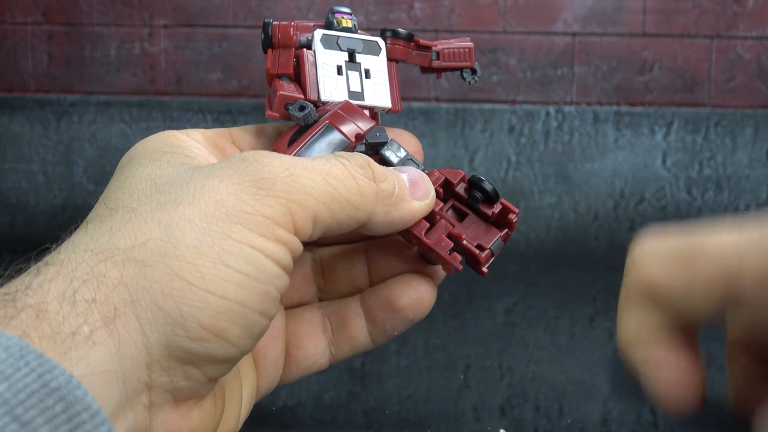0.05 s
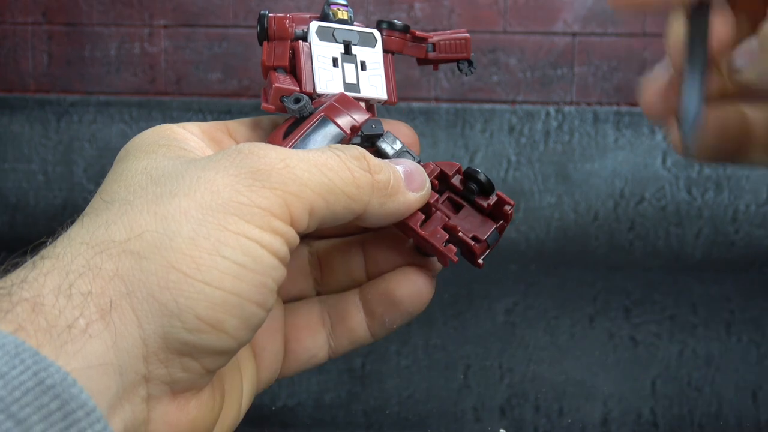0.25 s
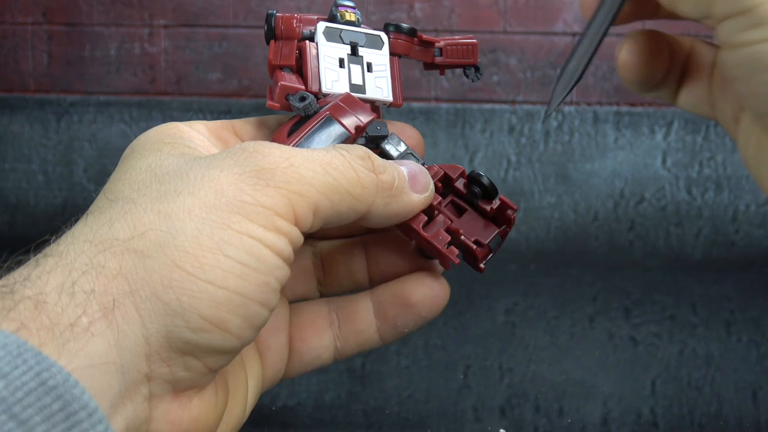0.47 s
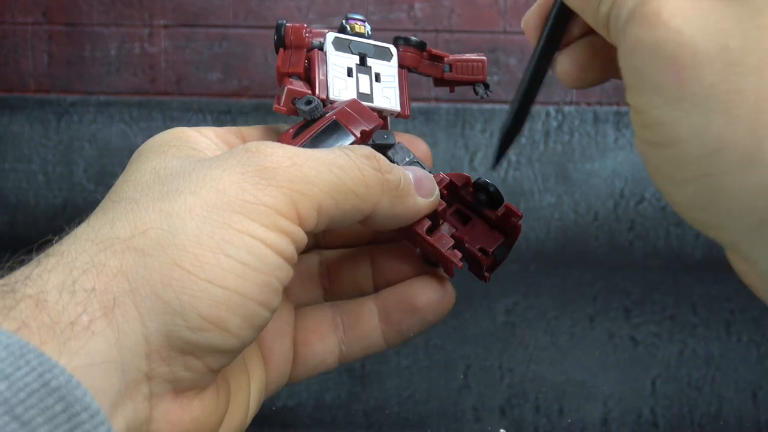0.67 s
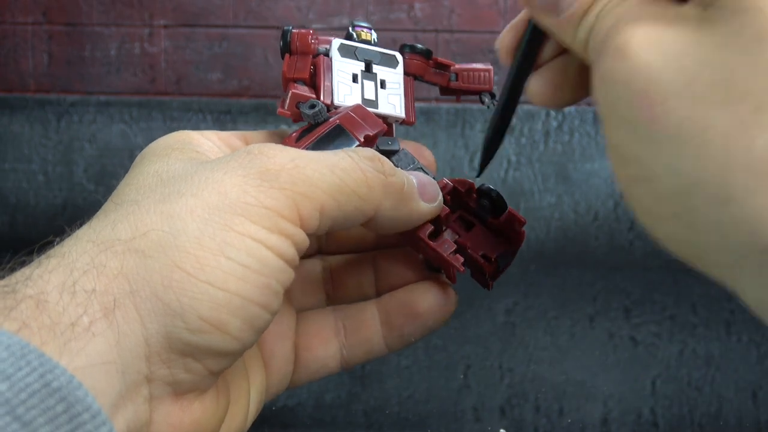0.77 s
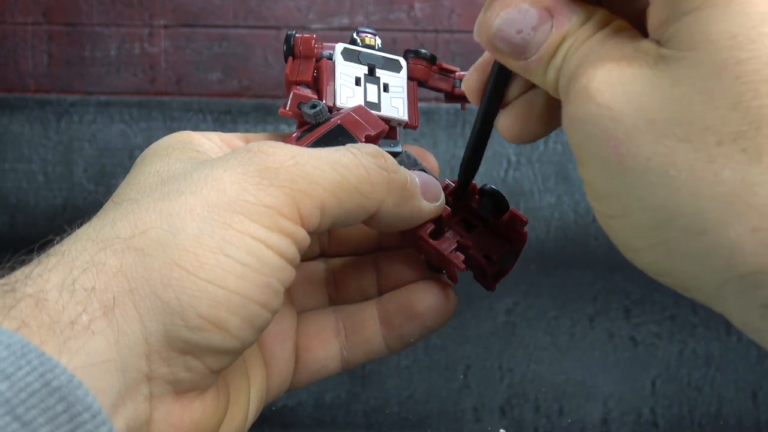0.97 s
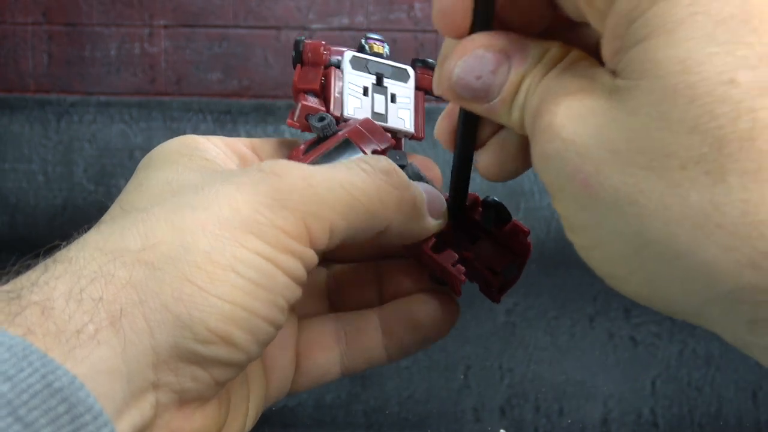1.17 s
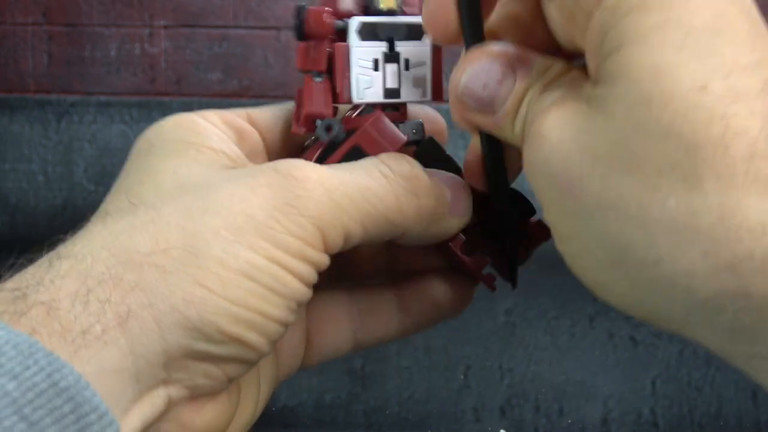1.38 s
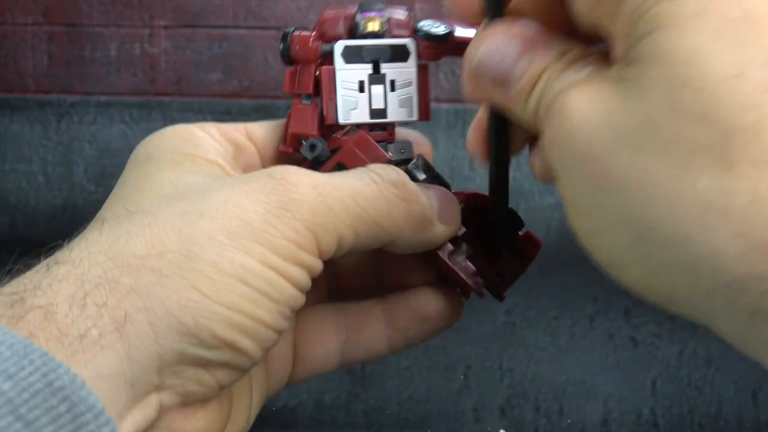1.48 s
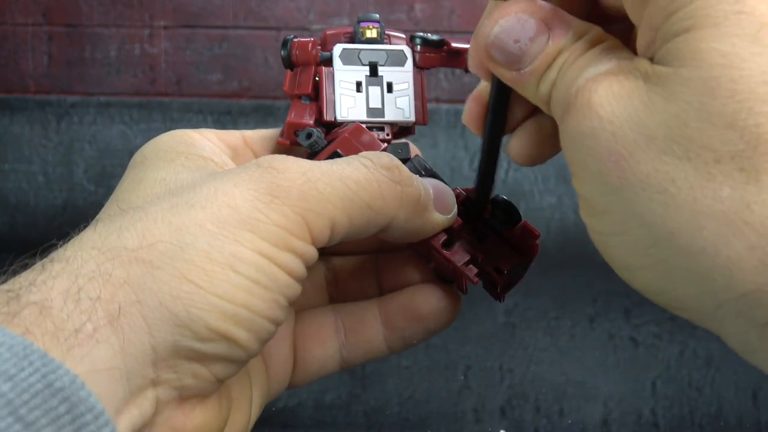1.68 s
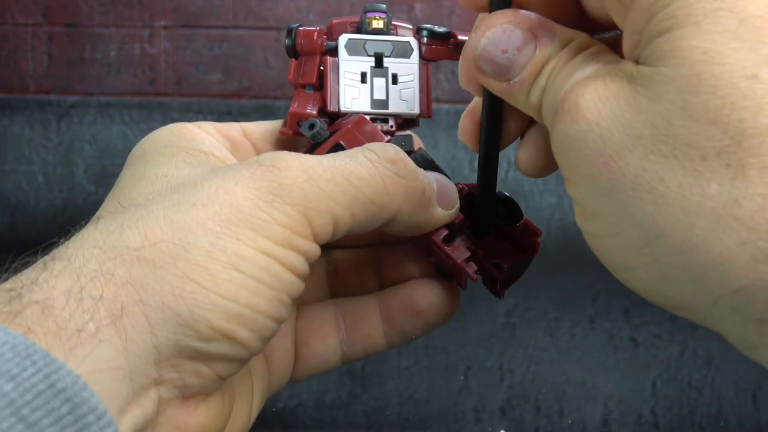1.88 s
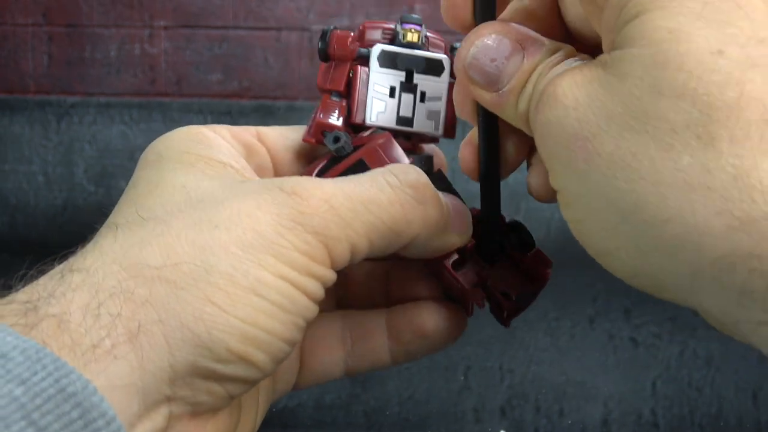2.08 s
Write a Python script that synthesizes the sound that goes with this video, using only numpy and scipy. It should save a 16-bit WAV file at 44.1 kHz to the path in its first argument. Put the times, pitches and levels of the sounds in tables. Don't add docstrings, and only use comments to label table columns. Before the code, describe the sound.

Close up in a quiet small room, fingers tick and rub on a plastic tool, its tip taps a hollow plastic figure, the joint snaps brightly with a small thud, rattles, and clicks a few more times.

```python
import sys
import numpy as np
from scipy import signal
from scipy.fft import rfft, irfft
from scipy.io import wavfile
from scipy.ndimage import uniform_filter1d

SR = 44100
rng = np.random.default_rng(int(sys.argv[2]) if len(sys.argv) > 2 else 0)


def log_audio(samples):
    frames = np.atleast_2d(samples).T
    limited = np.clip(frames, -1, 1)
    pcm = np.round(limited * 32767).astype(np.int16)
    wavfile.write(sys.argv[1], SR, pcm)


def makeup_ratio(level_db):
    decades = np.asarray(level_db, float) / 20
    return 10 ** decades


N = 94418


def band(x, lo_hz, hi_hz):
    return signal.sosfilt(signal.butter(3, [lo_hz, hi_hz], "bandpass", fs=SR, output="sos"), x)


def ring(force, modes):
    def bank(v):
        total = 0
        for hz, db, t60 in modes:
            pole = np.exp((2j * np.pi * hz - np.log(1000) / abs(t60)) / SR)
            total = total + makeup_ratio(db) * signal.lfilter([1], [1, -pole], v).imag
        return total
    return bank(force) / np.sqrt(np.sum(bank(signal.unit_impulse(2 ** 13)) ** 2))


def colour(points):
    hz, db = np.array(points, float).T
    f = np.maximum(np.arange(N // 2 + 1) * SR / N, 1)
    shape = makeup_ratio(np.interp(np.log(f), np.log(hz), db))
    noise = irfft(rfft(rng.standard_normal(N)) * shape, N)
    return noise / noise.std()


def swell(rows, column):
    t = np.arange(N) / SR
    total = np.zeros(N)
    for r in rows:
        rising = np.exp(np.clip((r[0] - t) / r[1], -50, 50))
        falling = np.exp(np.clip((t - r[0]) / r[2], -50, 50))
        total += 2 * makeup_ratio(r[column]) / (rising + falling)
    return total


def blows(rows, column, shapes):
    x = np.zeros(N + shapes.shape[1])
    for r, shape in zip(rows, shapes):
        i = max(int(r[0] * SR), 0)
        x[i:i + len(shape)] += makeup_ratio(r[column]) * shape
    return x[:N]


def push(rows, seconds):
    seconds = np.abs(seconds) * np.ones((len(rows), 1))
    bell = np.exp(-.5 * ((np.arange(1024) / SR - 2 * seconds) / (seconds / 2)) ** 2)
    return blows(rows, column=1, shapes=bell / bell.sum(axis=1, keepdims=True))


def flicker(count, hop):
    steps = np.repeat(rng.standard_normal((count, N // hop + 1)), hop, axis=1)
    return uniform_filter1d(steps, hop)[:, :N]


def slips():
    slips_per_s, spread_db, burst_db = 9000, 1.8, 3
    u = rng.random((3, N))
    struck = u[0] < slips_per_s / SR
    x = struck * np.sign(u[1] - .5) * makeup_ratio(-spread_db * np.log(u[2] + 1e-9))
    x = x * makeup_ratio(burst_db * flicker(1, 64)[0])
    return x / x.std()


def ping_bursts(rows):
    t = (np.arange(4096) - 2048) / SR
    hz, cycles = np.array(rows)[:, 2:3], np.array(rows)[:, 3:]
    length = cycles * np.where(t < 0, 0.64, 1)
    bursts = np.sin(2 * np.pi * hz * t) * np.exp(-.5 * (t * hz / length) ** 2)
    return np.roll(blows(rows, column=1, shapes=bursts), -2048)


# pitch_hz, level_db (per Hz)
HUM_SPECTRUM = [(15, -48), (25, 9), (277, 2.5), (439, 3.5), (936, 0.5), (1040, 3), (1480, -5.5),
                (9570, -15.5), (16000, -17.5)]
# pitch_hz, width_hz, level_db
DUCT_TONES = [(481.5, 6.7, -78.5), (1000, 103, -80)]


def hum():
    hum_db, side_db, hiss_side_db, right_db = -66.5, -7.5, 5, 0.7
    mid = makeup_ratio(hum_db) * colour(HUM_SPECTRUM)
    for hz, width_hz, db in DUCT_TONES:
        duct = signal.lfilter(*signal.iirpeak(hz, hz / width_hz, fs=SR), rng.standard_normal(N))
        mid = mid + makeup_ratio(db) * duct / duct.std()
    tilt_hz, tilt_db = [40, 150, 1500, 4000], [-14, 1.5, 1.5, hiss_side_db]
    tilted = [(hz, db + np.interp(np.log(hz), np.log(tilt_hz), tilt_db)) for hz, db in HUM_SPECTRUM]
    side = makeup_ratio(hum_db + side_db) * colour(tilted)
    return np.array([mid + side, (mid - side) * makeup_ratio(right_db)])


# peak_s, rise_s, fall_s, level_db
HAND_BRUSHES = [
    (.002, 0.0023, 0.017, -57.5),
    (.12, 0.034, 0.032, -63.5),
    (1.13, 0.042, 0.069, -68.5),
    (1.42, 0.087, 0.13, -61),
]
# pitch_hz, level_db (per Hz)
BRUSH_SPECTRUM = [(70, -14), (130, -5), (320, -7), (900, -12.5), (2500, -32)]


def brushes():
    return colour(BRUSH_SPECTRUM) * swell(HAND_BRUSHES, column=3)


# peak_s, rise_s, fall_s, level_db
FINGER_RUBS = [
    (.118, .002, 3, -77.5),
    (.14, 0.0057, 0.011, -61),
    (.245, 0.0057, 0.013, -67.5),
    (.352, 0.00091, 0.0091, -69.5),
    (.43, 0.02, 0.018, -71),
    (.758, 0.0075, 0.0083, -54.5),
    (2.09, 0.022, 0.0087, -60.5),
    (.57, 0.015, 0.017, -70),
    (.601, 0.0055, 0.0025, -49),
]
# pitch_hz, level_db (per Hz)
SKIN_SPECTRUM = [(1200, -5), (3000, 3), (5000, 7.5), (8000, 9), (12000, 7), (16000, -1.5)]
# pitch_hz, level_db, t60_s
TOOL_MODES = [(4900, 0, .012), (5250, 1, .016), (8500, -5, .006), (11400, -2, .007)]


def rubs():
    firm = ring(slips() * swell(FINGER_RUBS[-2:], column=3), TOOL_MODES)
    return colour(SKIN_SPECTRUM) * swell(FINGER_RUBS, column=3) + makeup_ratio(5) * firm


# peak_s, peak_db, pitch_hz, length_cycles
PICKUP_TICKS = [(.1189, -27, 9000, 0.21), (.1238, -52, 7000, 1.6), (.1273, -49, 5000, 1),
                (.128, -46, 8200, 3), (.133, -47, 7440, 2.5), (.1352, -42.5, 6500, 0.98),
                (.1387, -33, 13100, 1.2), (.139, -52, 4160, 2.3), (.143, -51, 3140, 3.2),
                (.1438, -44, 7500, 1.1), (.1482, -53, 3400, 4), (.1511, -45.5, 11900, 2.3),
                (.1515, -48.5, 4330, 1.8), (.125, -61, 125, 2.2), (.1755, -59, 4600, 2.7),
                (.24, -64, 2900, 9), (.3515, -50.5, 2480, 0.88), (.604, -40, 4930, 6.3)]


def pickup():
    return ping_bursts(PICKUP_TICKS)


# start_s, upper_db, lower_db, hollow_db
GRIP_SHIFTS = [(.98, -20, -7, -24), (1.08, -15, -8.5, -25), (1.34, 3.5, -17, -1), (1.36, 0.5, -12, -6.5),
               (1.385, 1, 4, -2), (1.415, -2.5, -7, 4), (1.435, 1, -9.5, -4), (1.46, 0, -2, 0.5),
               (1.49, -2, -12, -21), (1.515, -2.5, 0.5, -13), (1.538, 4, 3, 0), (1.565, -3, 6, -15),
               (1.59, -2, -4.5, -5), (1.67, -8, -8.5, -12), (1.71, -3.5, -9.5, -2.5),
               (1.75, -3.5, -11, -30), (1.899, -7, -7, -19), (2.07, 6.5, 3.5, 8)]
# pitch_hz, level_db, t60_s
SHELL_MODES = [(5370, -5, 0.0061), (5800, -1.5, 0.012), (6160, 2, 0.0066)]
UPPER_MODES = [(7200, -5, .006), (8000, -3, .007), (8600, 0, .01), (9200, -4, .007)]
LOWER_MODES = [(3410, 1.5, 0.0049), (4020, -5, 0.0088), (4780, 0.5, 0.0052)]
# pitch_hz, level_db, t60_s
CAVITY_MODES = [(2130, 0, .014), (2500, -3, .01)]
HOLLOW_MODES = [(1530, -3, .02), (1800, 0, .022)]


def figure(shell, cavity, edge, bare_db):
    time_s, *levels_db = np.array(GRIP_SHIFTS).T
    upper, lower, hollow = (makeup_ratio(np.interp(np.arange(N) / SR, time_s, db)) for db in levels_db)
    upper, lower = np.array([upper, lower]) * makeup_ratio(3.5 * flicker(2, 256))
    body = ring(shell, SHELL_MODES) + makeup_ratio(bare_db) * shell
    body = body + ring(shell * upper, UPPER_MODES) + ring(shell * lower, LOWER_MODES)
    inside = ring(cavity, CAVITY_MODES) + ring(cavity * hollow, HOLLOW_MODES)
    return band(body, 3440, 8410) + band(inside, 776, 2730) + band(edge, 8430, 14100)


def clicks(rows):
    crack_s, rattle_s, rattle_db = .0006, .004, -22
    t = np.arange(1024) / SR
    fade = t / crack_s * np.exp(-2 * t / crack_s) + makeup_ratio(rattle_db) * np.exp(-t / rattle_s)
    crack = rng.standard_normal((len(rows), 1024)) * fade
    crack[:, 2] += .45
    crack /= np.sqrt(np.sum(crack ** 2, axis=1, keepdims=True))
    shell, cavity, edge = (blows(rows, column=k, shapes=crack) for k in range(1, 4))
    return figure(2.18 * shell, makeup_ratio(7) * cavity, makeup_ratio(19.5) * edge, bare_db=-25)


# start_s, peak_db, cavity_db, edge_db
TIP_TICKS = [
    (.933, -50, -45, -67),
    (.9762, -36, -38, -45.5),
    (.9812, -34.5, -58, -74),
    (.9832, -50, -53, -76),
    (1.0244, -35, -34, -54.5),
    (1.1432, -40.5, -42.5, -47.5),
]


def ticks():
    return clicks(TIP_TICKS)


# peak_s, rise_s, fall_s, shell_db, cavity_db
TOOL_SCRAPES = [(1.059, 0.012, 0.022, -56.5, -56), (1.085, 0.0087, 0.004, -53.5, -54.5),
                (1.11, 0.01, 0.0078, -59, -62.5), (1.265, 0.012, 0.013, -68.5, -65.5),
                (1.345, 0.007, 0.019, -54.5, -54.5), (1.375, 0.012, 0.019, -48, -87),
                (1.415, 0.0065, 0.0027, -46.5, -56), (1.435, 0.0065, 0.0054, -43.5, -49),
                (1.47, 0.024, 0.007, -49, -62), (1.515, 0.023, 0.0092, -43.5, -54),
                (1.538, 0.0024, 0.0011, -57.5, -47.5), (1.59, 0.023, 0.024, -56.5, -64),
                (1.661, 0.003, 0.049, -58.5, -62), (1.701, 0.0034, 0.014, -52, -56),
                (1.716, 0.0046, 0.0048, -49, -58.5), (1.9, 0.006, 0.0073, -47, -63.5),
                (1.915, 0.0078, 0.038, -66.5, -77), (2.06, 0.0024, 0.0071, -61.5, -69)]


def scrapes():
    shell = slips() * swell(TOOL_SCRAPES, column=3)
    cavity = slips() * swell(TOOL_SCRAPES, column=4)
    return figure(shell, cavity, makeup_ratio(-9.0) * shell, bare_db=-43.0)


# start_s, peak_db, cavity_db, edge_db
JOINT_SNAPS = [(1.3418, -28, -64, -39), (1.343, -33, -66, -41), (1.3577, -58, -18.5, -30),
               (1.3586, -5, -20.5, -19), (1.3602, -11, -37, -68), (1.3643, -17, -29, -26),
               (1.366, -14, -33, -47), (1.3678, -16, -34, -41), (1.37, -34, -47, -44),
               (1.3755, -26, -54, -60), (1.4245, -44, -53, -41), (1.4312, -34.5, -69, -37),
               (1.456, -25, -62, -60), (1.4658, -40, -67, -58), (1.482, -30, -64, -70),
               (1.4985, -19, -38.5, -55), (1.5095, -26, -55, -55), (1.5115, -22.5, -43, -40),
               (1.519, -36, -60, -61), (1.5698, -32.5, -50, -60), (1.5835, -34.5, -47, -46)]


def snaps():
    return clicks(JOINT_SNAPS)


# peak_s, peak_db, pitch_hz,
# length_cycles
PART_PINGS = [(1.3502, -35, 5000, 1.9), (1.3592, -16, 11100, 4.7), (1.3595, -37, 13500, 6),
              (1.3622, -26, 2040, 0.94), (1.4115, -39, 5700, 4), (1.4247, -33, 5550, 2.5),
              (1.4312, -36, 8500, 6.2), (1.4665, -34, 8040, 5.7), (1.4992, -29.5, 7600, 4),
              (1.5118, -25, 7520, 3.2), (1.361, -47, 323, 2.23), (1.5705, -35, 3570, 0.92),
              (1.5845, -36, 8660, 9.1), (1.588, -51, 2020, 8), (1.7003, -33, 2630, 1.1),
              (1.714, -47, 3490, 11), (1.7555, -43, 597, 0.41), (1.7603, -44, 657, 1.36),
              (1.766, -45, 670, 0.48), (1.7855, -44.5, 2580, 0.26), (1.7885, -41, 435, 0.56),
              (1.7895, -39.5, 1010, 1.3), (1.7885, -45, 1690, 1.4), (1.8, -45, 1000, 1.3),
              (1.8015, -54.5, 473, 3.4), (2.07, -55.5, 106, 0.9), (1.912, -56, 2010, 7.4)]


def pings():
    return ping_bursts(PART_PINGS)


# start_s, level_db, contact_s
HAND_KNOCKS = [
    (1.359, -30.5, 0.0011),
    (1.52, -44, 0.00051),
    (1.699, -37.5, 0.00059),
    (1.704, -39.5, 0.00061),
    (1.888, -41, 0.00074),
]
# pitch_hz, level_db, t60_s
KNUCKLE_MODES = [(517, -20, 0.078), (660, -6, 0.04), (950, 9, 0.03), (1090, 17, 0.03), (1710, 24, 0.011)]


def knocks():
    force = push(HAND_KNOCKS, np.array(HAND_KNOCKS)[:, 2:])
    return makeup_ratio(25) * band(ring(force, KNUCKLE_MODES), 314, 3700)


# start_s, level_db
TABLE_JOLTS = [
    (1.364, -35),
    (1.42, -47),
    (1.46, -51.5),
    (1.53, -50),
    (1.712, -48),
    (1.895, -49.5),
]
# pitch_hz, level_db, t60_s
TABLE_MODES = [(74.6, 7, 0.15), (94, 8, 0.077), (166, 0, 0.11), (280, 3, 0.038)]


def jolts():
    force = push(TABLE_JOLTS, 0.0017)
    return makeup_ratio(24.5) * band(ring(force, TABLE_MODES), 37.0, 380)


# start_s, peak_db, cavity_db, edge_db
TOOL_TWISTS = [(1.6605, -33, -55, -72), (1.6993, -49, -42, -70), (1.704, -39, -49, -52),
               (1.7092, -32, -39, -56), (1.7142, -26, -37, -45), (1.7425, -35, -74, -64),
               (1.8852, -40.5, -35.5, -43.5), (1.893, -25.5, -49, -65), (1.8946, -28, -43, -56),
               (1.906, -26.5, -53, -48), (1.9135, -29, -69, -64), (2.0595, -45, -69, -52)]


def twists():
    return clicks(TOOL_TWISTS)


def room(x, side_db, low=0):
    t60_s, gap_s, tail_db, low_side_db = 0.097, 0.0008, -11.5, 1
    t = np.arange(2 ** 13) / SR
    tails = rng.standard_normal((2, 2 ** 13)) * makeup_ratio(-60 * t / t60_s) * np.clip(t / gap_s, 0, 1)
    tails = tails / np.sqrt(np.sum(tails ** 2, axis=1, keepdims=True))
    mid = signal.fftconvolve(x, tails[0])[:N] * makeup_ratio(tail_db)
    side = signal.fftconvolve(x + low, tails[1])[:N] * makeup_ratio(tail_db)
    spread = band(side, 5100, 16000) * makeup_ratio(side_db) + band(side, 170, 1600) * makeup_ratio(low_side_db)
    return mid + spread * np.array([[1], [-1]])


def scene():
    background = hum()
    low = brushes() + knocks() + jolts()
    hands = rubs() + pickup()
    toy = ticks() + scrapes() + snaps() + pings() + twists()
    echoes = room(toy, -5.5, low) + room(hands, 4.5)
    return toy + hands + echoes + low * makeup_ratio(np.array([[.7], [-.7]])) + background


def roll_off(x):
    return signal.sosfilt(signal.butter(12, 16630, fs=SR, output="sos"), x)


def record(dry):
    mix = signal.sosfilt(signal.butter(8, 15600, fs=SR, output="sos"), dry)
    return roll_off(mix)


dry = scene()
out = record(dry)
log_audio(out)
```